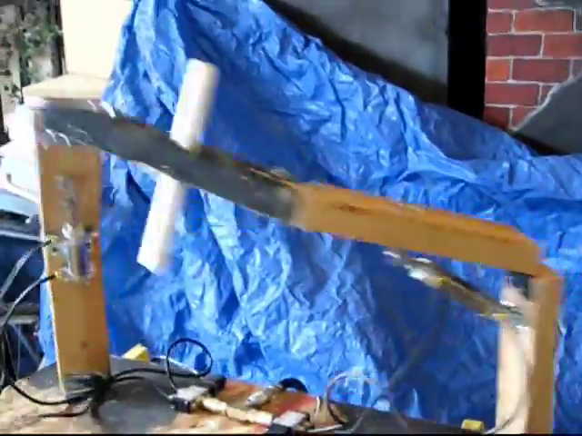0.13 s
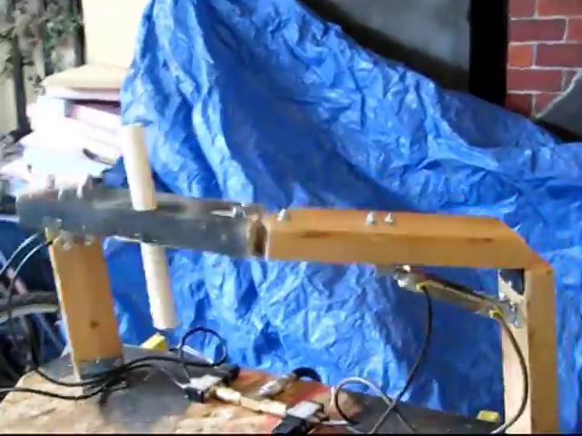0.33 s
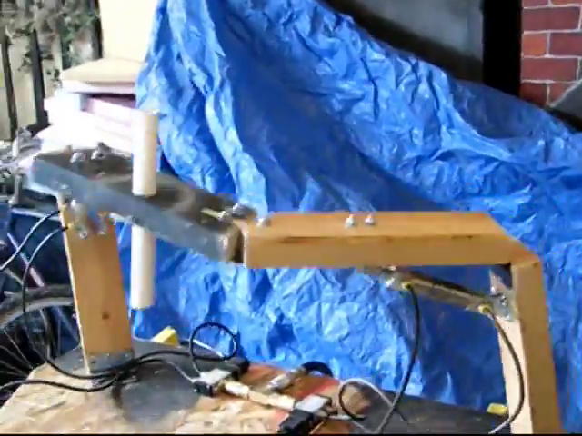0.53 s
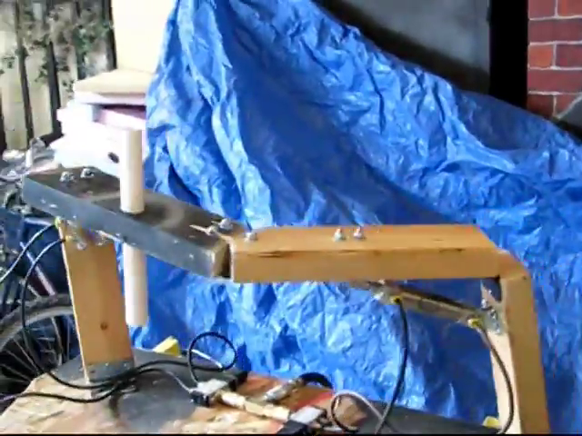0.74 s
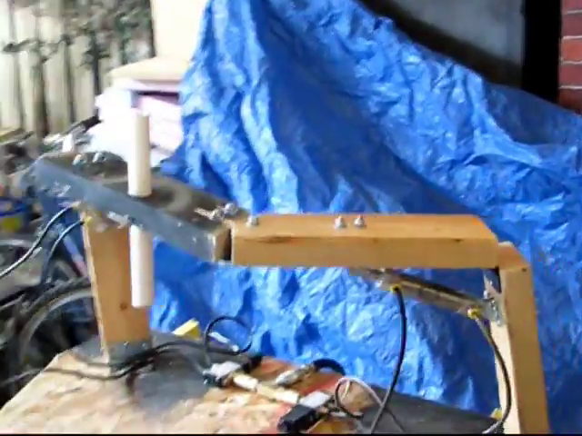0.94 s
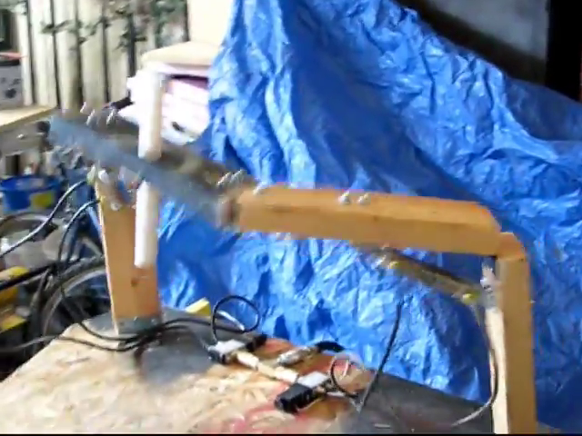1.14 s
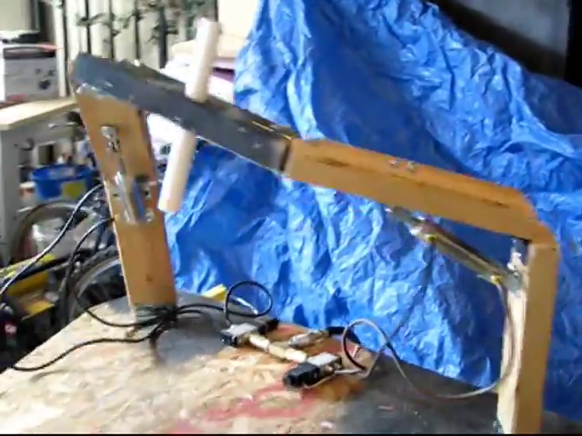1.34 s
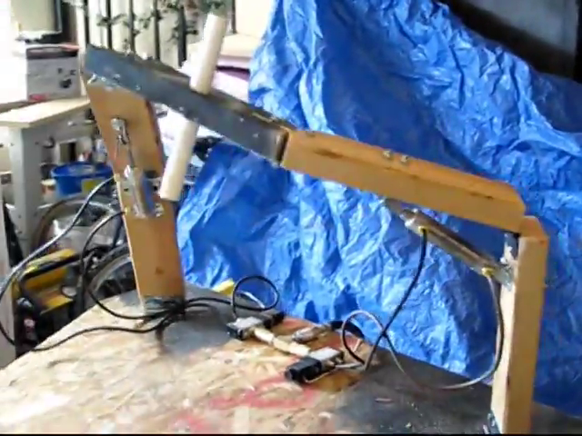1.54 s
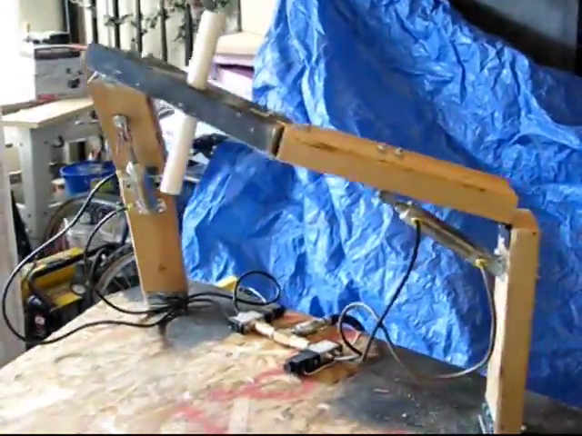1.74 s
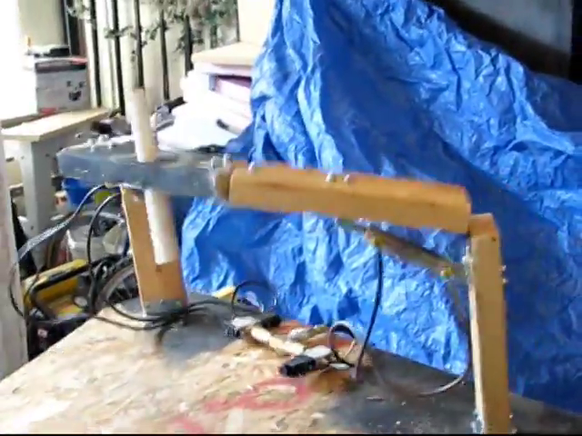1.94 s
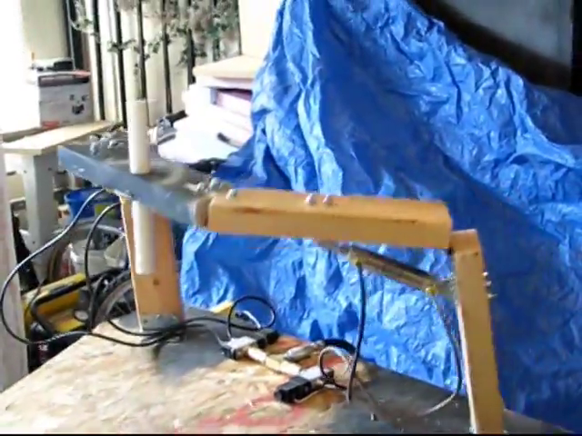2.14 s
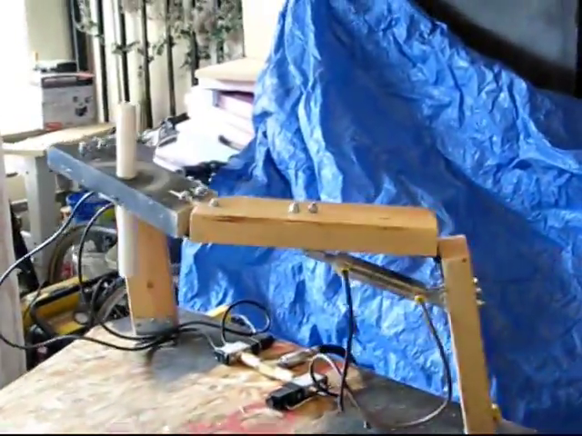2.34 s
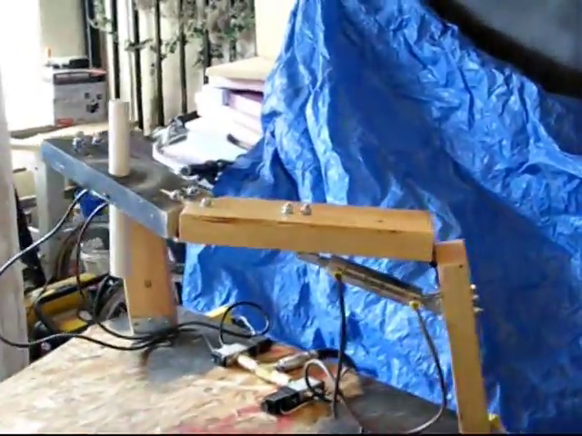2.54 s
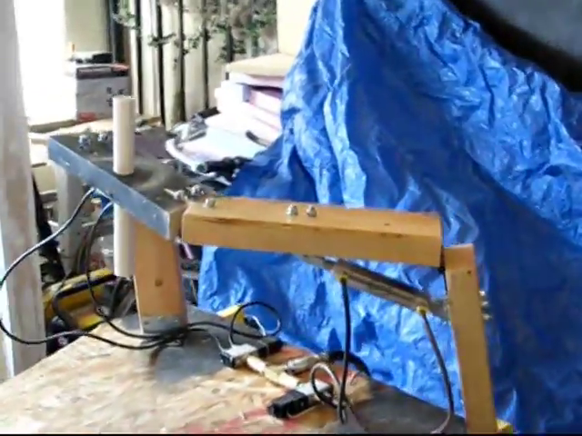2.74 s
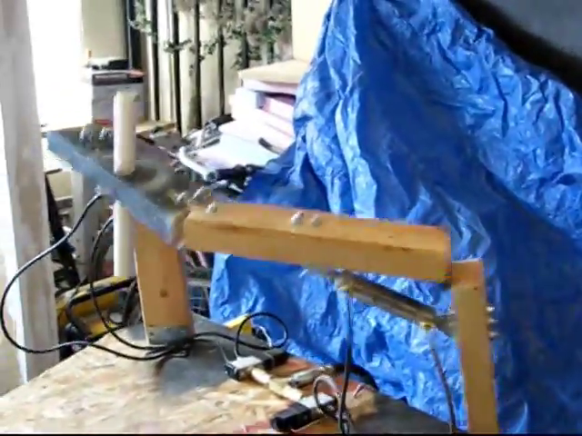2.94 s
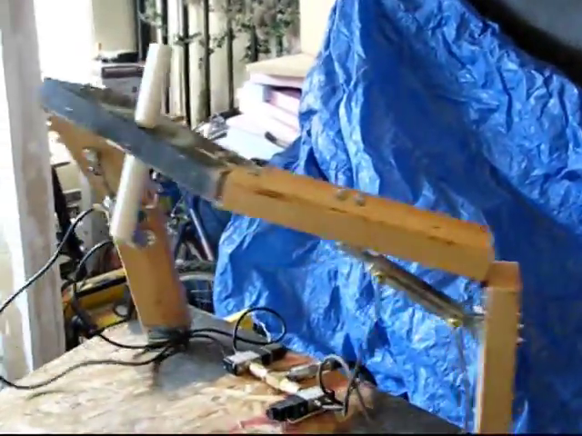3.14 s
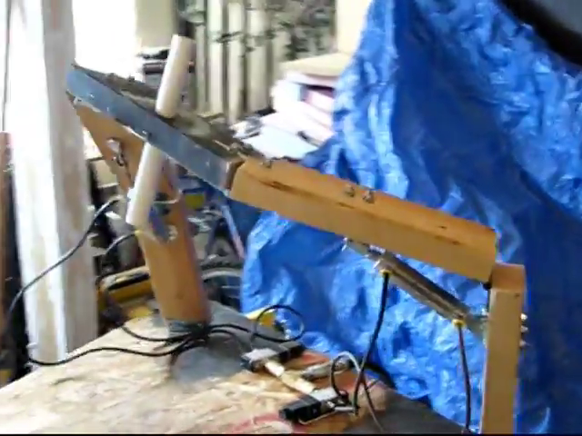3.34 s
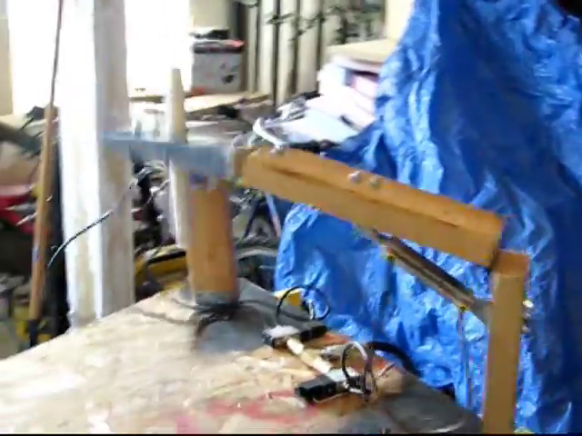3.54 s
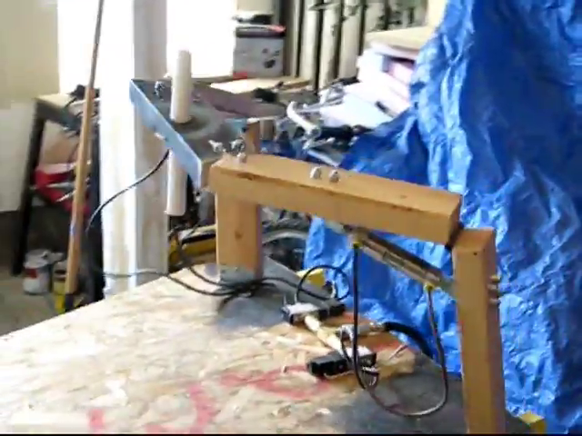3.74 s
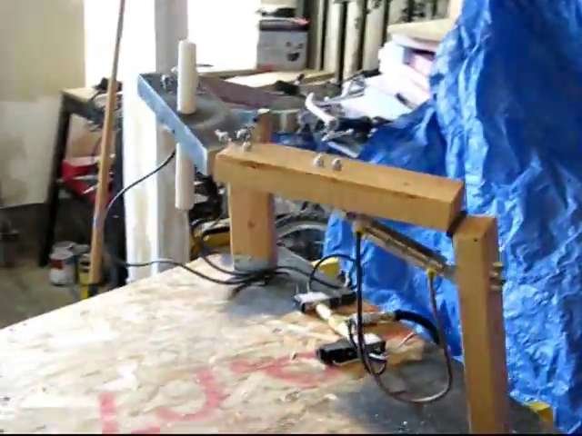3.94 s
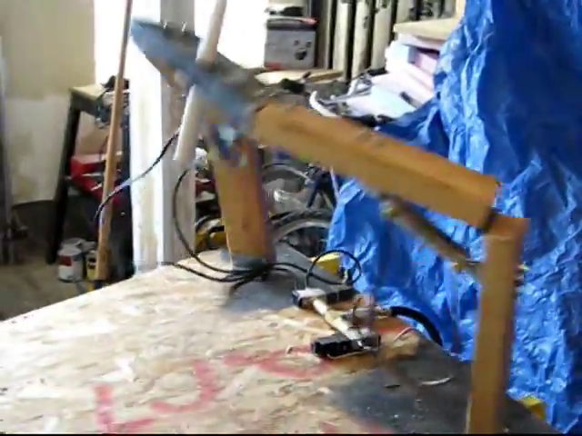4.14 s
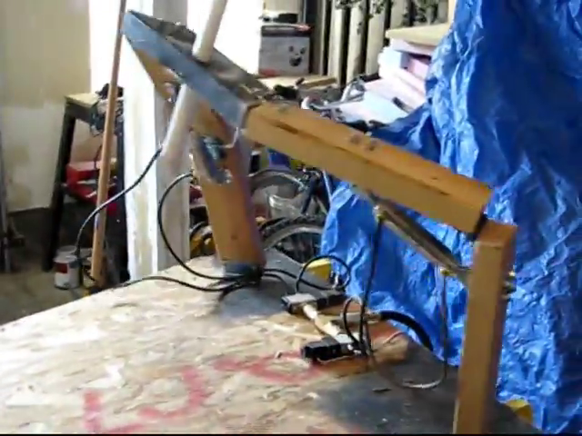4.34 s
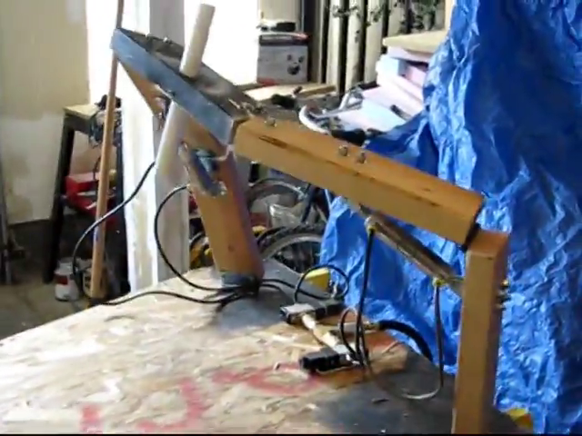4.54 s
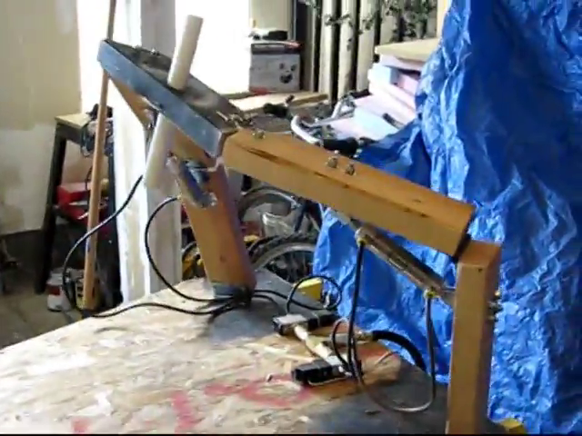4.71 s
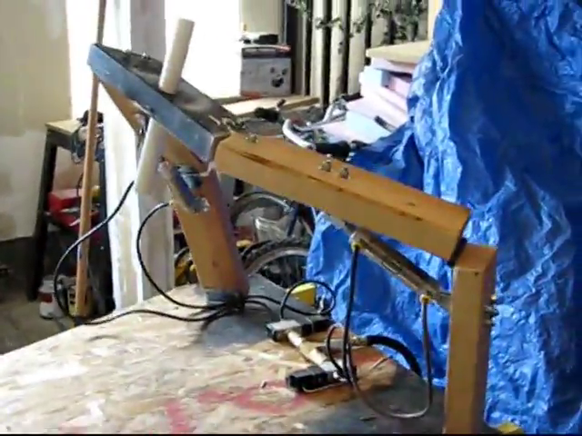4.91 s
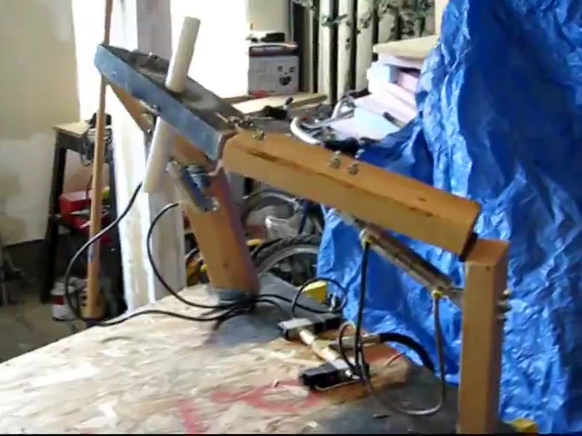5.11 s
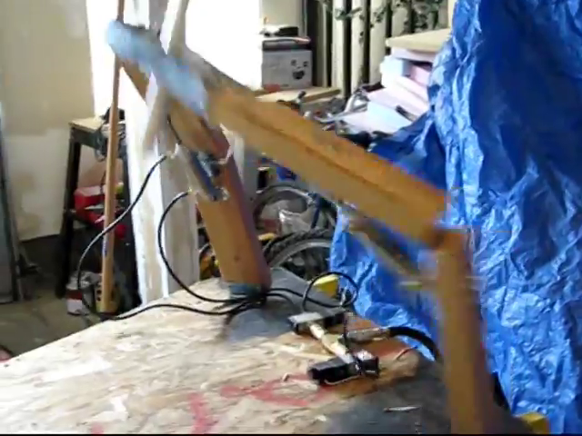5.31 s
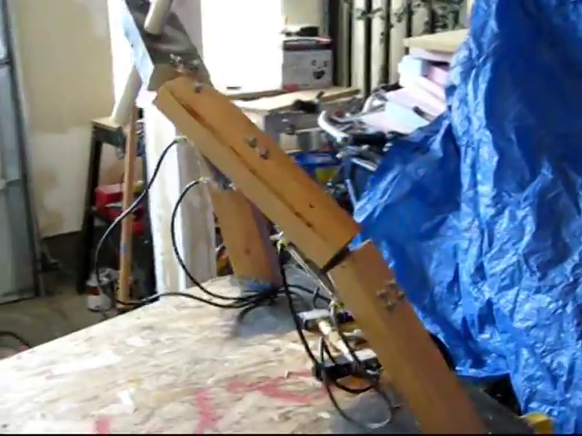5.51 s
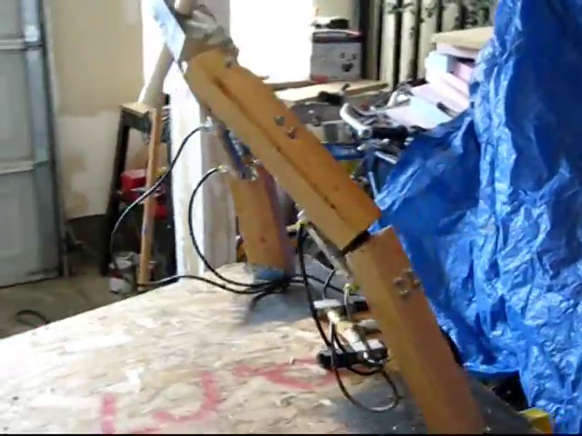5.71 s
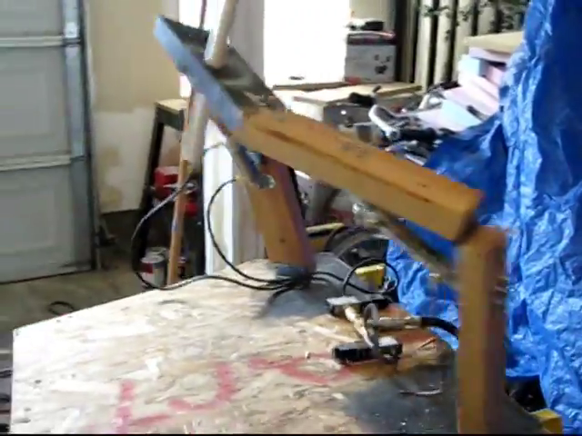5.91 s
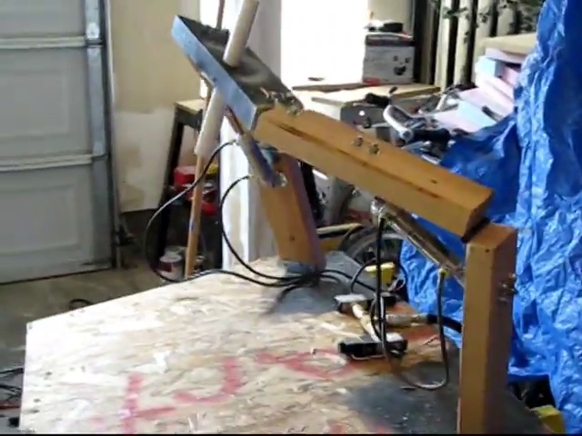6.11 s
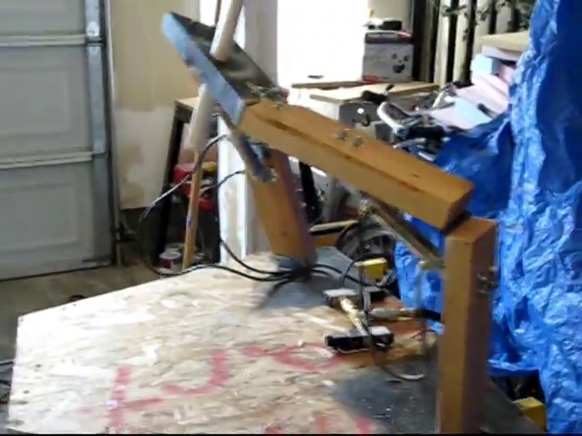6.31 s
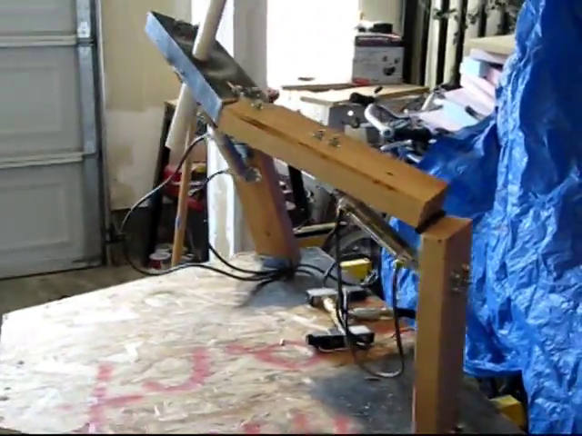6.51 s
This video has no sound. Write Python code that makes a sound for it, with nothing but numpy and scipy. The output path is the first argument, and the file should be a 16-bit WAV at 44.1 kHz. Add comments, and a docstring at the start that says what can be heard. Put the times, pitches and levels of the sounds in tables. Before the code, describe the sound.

Pneumatic cylinders jerk a prop's jointed wooden arms eight times at uneven intervals. Each move starts with a valve click and a short rush of air, scrapes briefly, then ends in a hard knock with a metallic crack and ticking loose joints. A few tiny squeaks slip in, and the last two moves come close together. It is heard nearby in stereo, in a garage with short reverberation and a low rumble.

```python
"""Hard knocks and rattles: pneumatic cylinders jerk a prop's jointed wooden arms up and down.
Each move is a valve click, a rush of air, a scraping stroke and a slam at the end stop, after which
the loose joints tick and the frame rings briefly. Seals squeak and hoses rustle in between.
The place is a garage with a low background rumble, heard from a closely spaced microphone pair,
near enough for sharp cracks and far enough for the room to answer every blow."""
import sys
import numpy as np
from scipy import signal
from scipy.fft import rfft, irfft, next_fast_len
from scipy.io import wavfile
from scipy.ndimage import uniform_filter1d

SR = 44100
rng = np.random.default_rng(int(sys.argv[2]) if len(sys.argv) > 2 else 0)


def materialize(psi):
    """Save the field psi as 16-bit PCM at rate SR to the path in sys.argv[1].

    A 1-D psi becomes a single channel; in a 2-D psi each row is a channel.
    """
    bounded = np.clip(np.atleast_2d(psi).T, -1, 1)
    quanta = np.round(bounded * 32767).astype(np.int16)
    wavfile.write(sys.argv[1], SR, quanta)


N = 289296

# Table levels are relative: filters and each layer's gain act on them. Bass and treble are shelves.
# spectra of the sources: f/Hz, level/dB
LIFT = [(50, -11), (130, 1.5), (240, -3), (350, -5), (490, -5), (620, -0.5), (900, -6), (1750, -5),
        (2200, -11), (3100, -7.5), (5000, -9.5), (8500, -16), (12000, -20.5), (16000, -39)]  # arm thrown up
DROP = [(45, -11.5), (140, -8.5), (280, -5), (400, -1), (700, 0), (1050, -3.5), (1500, -4.5), (2200, -5),
        (2800, -9), (4200, -13.5), (6200, -16.5), (7500, -19), (12000, -24), (16000, -32.5)]  # arm dropped
REACH = [(50, -24.5), (115, -12.5), (200, -8), (400, -8.5), (560, 1.5), (750, -3.5), (1500, -4.5),
         (2500, -9.5), (4500, -15.5), (6800, -23), (9000, -23.5), (13000, -32), (16000, -37)]  # long reach
PULL = [(45, 1), (80, -17.5), (150, -0.5), (320, -2.5), (450, -5.5), (600, -4), (800, -11), (1100, -7),
        (1800, -7), (2600, -11.5), (3500, -10), (6500, -16), (11000, -22), (16000, -36)]  # pull back
KICK = [(60, -24), (130, -9.5), (420, -9.5), (520, -9.5), (680, 1.5), (880, -7), (1100, -11), (1700, -8),
        (2300, -16.5), (6000, -16), (10000, -20), (16000, -33)]  # piston kicking off
HARDWARE = [(80, -10.5), (300, -7), (1000, 0.5), (2300, -3.5), (4000, -4.5), (7000, -8.5), (11000, -10.5),
            (16000, -23.5)]  # loose bolts and hinges
CRACK = [(60, -22), (250, -17), (520, -4.5), (900, -14.5), (1550, 1.5), (2400, -3.5), (3300, 0.5),
         (4300, -6), (5700, -7), (8000, -11.5), (12000, -20.5), (16000, -21.5)]  # metal on metal
VALVE = [(100, -6), (600, -1), (2000, -3), (5000, -1.5), (9000, -2.5), (14000, -4), (16000, -6.5)]  # solenoid click
AIR = [(100, -1.5), (400, 0.5), (1300, -9.5), (2000, -0.5), (3100, -2.5), (4100, -1.5), (5200, -1),
       (8000, -8.5), (11500, -6.5), (14000, -10.5), (16000, -16.5)]  # air jet, also the rustles
SLIDE = [(60, -8), (146, -3), (230, -2.5), (370, 2), (480, -6), (640, -1), (1200, -7), (1750, -3),
         (2300, -9.5), (4400, -9.5), (9000, -18.5), (16000, -33.5)]  # rods and wood rubbing
HUSH = [(20, -2), (45, -1), (80, -8), (125, -9.5), (200, -17), (280, -15), (400, -24), (800, -19),
        (1500, -24.5), (3700, -26), (7300, -29.5), (14000, -36), (16000, -45)]  # room tone
# end-stop spectrum for each kind of move
STOP_SPECTRA = {"lift": LIFT, "drop": DROP, "reach": REACH, "pull": PULL}
# moves: valve t/s, kind, valve/dB, air/dB, air treble/dB, kick-off/dB, slide/dB
MOVES = [ (0.127, "drop", -40, -45, -11, -34, -27.5), (1.0574, "lift", -23.5, -30, 5, -47.5, -42.5),
         (1.752, "drop", -33.5, -26, -9, -30.5, -28), (2.8725, "lift", -17.5, -28, 3.5, -46, -43),
         (3.4503, "drop", -30.5, -23, -6.5, -29.5, -23.5), (3.9984, "lift", -24.5, -35.5, 7.5, -58, -45),
         (5.2672, "reach", -13.5, -32, -4, -21.5, -34.5), (5.7267, "pull", -29.5, -28.5, -23, -34, -22.5)]
# end stop of each move: t/s, body/dB, bass/dB, treble/dB, crack/dB, ring/dB, resonance f/Hz, height/dB
STOPS = [ (0.2683, -17, -3.5, 0.5, -5.5, -24.5, 1500, 6.5), (1.3105, -23, -6, -1.5, -15, -39.5, 370, 5.5),
         (1.8841, -23, 7, 7, -9.5, -37, 1896, 0), (3.1156, -19.5, -3, 3, -19, -35, 370, 11.5),
         (3.5795, -23.5, -2, 4.5, -5.5, -30, 1578, 4), (4.2477, -22.5, -6.5, -4, -20, -32, 1730, -1),
         (5.4284, -22, 2.5, 17.5, -17.5, -24.5, 124.5, 9.5), (5.8372, -16.5, 0.5, -2, -11, -29.5, 805, 13)]
# one rebound after each stop: t/s, kind, body/dB, treble/dB, crack/dB, resonance f/Hz, height/dB
REBOUNDS = [(0.2896, "drop", -20.5, -15, -4.5, 2850, 11.5), (1.334, "lift", -38.5, -8, -18.5, 1440, -2.5),
            (1.902, "drop", -21.5, 0, -10.5, 2844, 6.5), (3.135, "lift", -32, 6.5, -22.5, 4034, 7.5),
            (3.599, "drop", -25.5, 1, -20, 3300, 3.5), (4.2709, "lift", -28, -12.5, -15.5, 7360, 12),
            (5.433, "reach", -39.5, 20, -21.5, 9600, 10), (5.854, "pull", -30.5, -12.5, -10.5, 1220, 16)]
# a heavy arm sags back onto its joints: t/s, kind, body/dB, bass/dB, treble/dB, ring/dB
SETTLES = [(1.983, "drop", -23.5, 2, -8.5, -43), (3.680, "drop", -25, -0.5, -26, -28.5),
           (5.508, "reach", -27, 11.5, 14, -36), (5.910, "pull", -27, 0.5, 4, -36.5)]
# loose hardware knocks: t/s, body/dB, resonance f/Hz, height/dB
KNOCKS = [(.06, -33.5, 740, 9), (.191, -31.5, 4100, -5), (1.241, -39.5, 2300, 12.5),
          (1.261, -45.5, 2410, 12.5), (1.472, -50, 6700, 2), (1.812, -28.5, 4230, -2.5),
          (2.343, -56.5, 3300, 12.5), (3.035, -46.5, 2850, 14), (3.068, -45, 3630, 7),
          (3.287, -43.5, 5360, 3.5), (3.512, -35.5, 4500, 8), (3.814, -43, 4070, 4)]
# piston taking up slack, by kind: bass/dB, treble/dB, crack over body/dB, resonance f/Hz, height/dB
KICK_OFF = {"lift": (5, -6, 15, 399, 4), "drop": (3, 1.9, 7, 1550, 2), "reach": (-1.5, 2, -5.5, 791, 0.5),
            "pull": (1, 12.6, 8.1, 5900, 3.1)}
# wait after the valve click, by kind: t/s
KICK_LAG_S = {"lift": .0104, "drop": .034, "reach": .023, "pull": .0297}  # until the piston moves
AIR_LAG_S = {"lift": .004, "drop": .018, "reach": .012, "pull": .033}  # until the port vents
# modes of the wooden frame and its fittings: f/Hz, level/dB, t60/s
FRAME_MODES = [(125, -7, 0.68), (264, -2, 0.6), (274, -6.5, 0.5), (327.5, -8, 0.6), (381.3, -5, 0.72),
               (496.5, -10.5, 0.44), (581.6, -2.5, 0.32), (725, -12, 0.18), (802, -13, 0.25),
               (917, -12, 0.27), (1113, -9.5, 0.55), (1295, -8.5, 0.15), (1678, -14.5, .42),
               (1773, -14, 0.18), (2110, -17, 0.32), (2707, -16, 0.2), (2790, -17, 0.24), (3040, -19, 0.31),
               (3690, -15, 0.13), (4800, -20, 0.24), (6080, -18, 0.11)]
# sliding, by kind: change over the stroke/dB, bass/dB, treble/dB, resonance f/Hz, height/dB
TRAVEL = {"lift": (1, 8, -8, 800.5, 3.5), "drop": (-5, 7, 0.5, 1743.5, 4),
          "reach": (1.5, 1, -6, 1601.5, 4.5), "pull": (-21, -14, -17.5, 1537, 7)}
# frame shudders: start/s, end/s, first/dB, last/dB, bass/dB, treble/dB, resonance f/Hz, height/dB
SHUDDERS = [(0, 0.058, -23, -36, -4, -0.5, 2960, 10), (0.06, 0.165, -33, -33.5, 6.5, -9, 300, 0),
            (3.601, 3.777, -26, -42, 1.5, -0.5, 1143, -6), (5.552, 5.775, -39.5, -43, -8.5, -17.5, 8800, 5),
            (5.95, 6.143, -62, -39, 3, -2, 122, 33)]
# solenoid, by kind: click swell/ms, room/dB
SOLENOID = {"lift": (1.4, -13.5), "drop": (2.6, -3), "reach": (0.72, -13.5), "pull": (1.9, -8)}
# exhaust port, by kind: rise/s, decay/s, resonance f/Hz, height/dB
PORT = {"lift": (0.004, 0.035, 11000, 2.4), "drop": (0.0092, 0.055, 4400, 4.7),
        "reach": (.006, .22, 8700, 11), "pull": (.006, .11, 10000, 3)}
# dry seals and hinges: start/s, end/s, first f/Hz, last f/Hz, level/dB, roughness (0-1)
SQUEAKS = [(.054, .112, 780.6, 699, -31, .65), (0.194, 0.208, 4080, 3970, -32, 0.42),
           (.207, 0.236, 6600, 6250, -36.5, 0.4), (2.776, 2.814, 1042, 1180, -66, 0.86),
           (3.553, 3.573, 4920, 4710, -26, 0.6), (3.561, 3.59, 6000, 6100, -25.5, .65),
           (5.286, 5.361, 695, 960, -27, .75), (5.403, 5.408, 8800, 8300, -30, .3)]
# hoses and tarpaulin: start/s, end/s, level/dB, treble/dB
RUSTLES = [(0.566, 0.647, -46, -23), (0.784, .841, -48.5, -19), (0.995, 1.055, -63, 0.5),
           (1.499, 1.661, -62, 1), (4.555, 4.696, -68, 15), (5.017, 5.09, -57.5, 4.5)]
# slow drift of the room tone: t/s, level/dB
HUSH_LEVEL = [(0, -69), (1, -60.5), (2.7, -61.5), (4.901, -58.5), (5.2, -58), (6.5, -57)]
# reverberation of the garage: f/Hz, t60/s
GARAGE_T60 = [(60, .59), (130, .95), (350, .74), (700, .67), (1400, .73), (2700, .6), (4000, .55),
              (5500, .48), (8000, .42), (11000, .31), (16000, .25)]
# diffuse sound at the microphone pair: f/Hz, side minus mid/dB
WIDTH = [(40, -24), (125, -30), (250, -24), (500, -16.5), (1000, -11), (2000, -4.5), (4000, 0), (12000, 2)]
# colour difference between the microphones: f/Hz, left minus right/dB
MIC_BALANCE = [(350, 0), (1000, -.3), (2200, -3.8), (4000, .3), (8000, .4), (14000, -.3)]


def blows():
    """The piston kicks off, slams into its stop and rebounds; arms settle and hardware knocks."""
    out = np.zeros((2, N))
    for s, kind, _, _, _, db, _ in MOVES:
        bass_db, treble_db, crack_db, *resonance = KICK_OFF[kind]
        kick = blow(KICK, db, db + crack_db, db - 17.5, bass_db, treble_db, *resonance, crack_ms=5)
        add(out, s + KICK_LAG_S[kind], kick)
    for (_, kind, *_), (s, db, bass_db, treble_db, crack_db, ring_db, *resonance) in zip(MOVES, STOPS):
        slam = blow(STOP_SPECTRA[kind], db, crack_db, ring_db, bass_db, treble_db, *resonance)
        add(out, s, slam)
    for s, kind, db, treble_db, crack_db, *resonance in REBOUNDS:
        bounce = blow(STOP_SPECTRA[kind], db, crack_db, db - 11, 1.5, treble_db, *resonance, crack_ms=2.3)
        add(out, s, bounce)
    for s, kind, db, bass_db, treble_db, ring_db in SETTLES:
        add(out, s, blow(STOP_SPECTRA[kind], db, db + 2, ring_db, bass_db, treble_db, crack_ms=3))
    for s, db, *resonance in KNOCKS:
        add(out, s, blow(HARDWARE, db, db + 9, db - 19, 2.5, -3.5, *resonance, crack_ms=2.6))
    return out


def blow(spectrum, body_db, crack_db, ring_db, bass_db, treble_db, part_hz=1000, part_db=0,
         crack_ms=2.45, wood_decay_s=0.03):
    """One blow: a body of woody clatter and room tail, a metal crack and the ringing frame."""
    t = np.arange(SR) / SR
    clatter = gain_of(-2) * friction(SR, grain_db=9.5, grains_hz=596.3) * np.exp(-t / wood_decay_s)
    body = coloured(clatter + room_tail(), spectrum, bass_db, treble_db, part_hz, part_db, width=0.13)
    crack = coloured(chatter(crack_ms), CRACK, 0, treble_db, part_hz, part_db)
    out = gain_of(body_db) * body
    add(out, 0, gain_of(crack_db) * crack)
    add(out, 0, gain_of(ring_db) * frame_ring())
    return out


def chatter(swell_ms, spread=0.92):
    """Hard parts chatter in contact for a few milliseconds, partly alike at both microphones."""
    u = np.arange(SR // 25) / SR * 1000 / swell_ms
    shape = u ** 2 * np.exp(1 - u ** 2)
    burst = rng.standard_normal(len(u)) * shape
    for _ in range(8):  # a hard contact excites all frequencies evenly, yet stays short
        flat_spectrum = np.exp(1j * np.angle(rfft(burst)))
        burst = irfft(flat_spectrum, len(u)) * shape ** .5
    burst = evened(burst) + spread * evened(diffuse(len(u)) * shape)
    return evened(burst) * np.sqrt(np.mean(shape ** 2))


def frame_ring(build_s=0.0069):
    """The frame's modes ring down, with new phases at every blow."""
    t = np.arange(SR) / SR
    ring = sum(gain_of(db - 60 * t / t60) * np.sin(2 * np.pi * (hz * t + rng.random()))
               for hz, db, t60 in FRAME_MODES)
    return gain_of(-2) * ring * (1 - np.exp(-t / build_s))


def through_frame(x, q=50, fittings_hz=900):
    """Narrow resonances, mostly those of the metal fittings, colour whatever sounds in the arms."""
    peaks = sum(gain_of(db / 4) * hz / (hz + fittings_hz) * resonate(x, hz, q)
                for hz, db, _ in FRAME_MODES)
    return gain_of(-0.99) * (x + 2 * gain_of(-7) * peaks)


def on_bench(x):
    """The bench top hums at one note along with the arms bolted to it."""
    return x + gain_of(-3) * resonate(x, hz=264.7, q=51)


def thumps(hz=137.7, swell_s=0.0085):
    """Each end stop shoves the bench, which answers with a short low thump."""
    out, t = np.zeros(N), np.arange(SR // 4) / SR
    push = np.sin(2 * np.pi * hz * t) * t / swell_s * np.exp(1 - t / swell_s)
    for s, body_db, bass_db, *_ in STOPS:
        add(out, s, gain_of(body_db + bass_db - 8.5) * push)
    return out


def loose_joints(ticks=8, spread_db=3, mean_wait_s=0.033, fade_db_per_s=85):
    """Bolts and hinges go on ticking after each end stop, weaker as the shaking dies."""
    out = np.zeros((2, N))
    for s, body_db, *_ in STOPS:
        for wait, size in zip(rng.exponential(mean_wait_s, ticks), rng.uniform(-1, 1, ticks)):
            tick_db = body_db - 15 + spread_db * size - fade_db_per_s * wait
            tick = coloured(chatter(swell_ms=1), HARDWARE, treble_db=0.5)
            add(out, s + .02 + wait, gain_of(tick_db) * tick)
    return out


def strokes():
    """Rods slide and wooden joints scrape from kick-off to end stop, and while the frame shudders."""
    out = np.zeros(N)
    for (s, kind, *_, db), (stop_s, *_) in zip(MOVES, STOPS):
        start = s + KICK_LAG_S[kind]
        change_db, *colour = TRAVEL[kind]
        add(out, start, scrape(stop_s - start, db, db + change_db, *colour))
    for start, end, *levels_and_colour in SHUDDERS:
        add(out, start, scrape(end - start, *levels_and_colour))
    return gain_of(-6) * in_garage(out, direct_db=1.5)


def scrape(length_s, first_db, last_db, *colour):
    """Friction that swells or fades evenly while wood and rod move."""
    count = int(length_s * SR)
    speed = gain_of(np.linspace(first_db, last_db, count)) * signal.windows.tukey(count, .05)
    rubbing = friction(SR, grain_db=2, grains_hz=303)[:count]
    return coloured(speed * rubbing, SLIDE, *colour)[0]


def friction(count, grain_db, grains_hz):
    """Rubbing noise whose strength varies from grain to grain."""
    grain = np.arange(count) * grains_hz / SR
    sizes_db = grain_db * rng.standard_normal(SR // 10)
    strength = gain_of(np.interp(grain, np.arange(len(sizes_db)), sizes_db))
    return evened(rng.standard_normal(count) * strength)


def valves():
    """A solenoid snaps over before each move and the room answers."""
    out = np.zeros((2, N))
    for s, kind, db, *_ in MOVES:
        swell_ms, room_db = SOLENOID[kind]
        click = gain_of(room_db) * room_tail()
        add(click, 0, chatter(swell_ms))
        add(out, s, gain_of(db) * coloured(click, VALVE))
    return out


def exhaust():
    """Just after the valve opens, air jets from the port and fades as the cylinder empties."""
    out, t = np.zeros(N), np.arange(SR // 2) / SR
    for s, kind, _, db, treble_db, *_ in MOVES:
        rise_s, decay_s, port_hz, port_db = PORT[kind]
        pressure = (1 - np.exp(-t / rise_s)) * np.exp(-t / decay_s)
        turbulence = pressure * rng.standard_normal(len(t))
        jet = coloured(turbulence, AIR, 0, treble_db, port_hz, port_db, width=0.078)[0]
        add(out, s + AIR_LAG_S[kind], gain_of(db) * jet)
    return gain_of(-3) * in_garage(out, direct_db=3.5)


def squeaks(waver_hz=120, fade_db=-5.5):
    """Seals and hinges stick and slip at an unsteady pitch; rough ones catch and let go at random."""
    out = np.zeros(N)
    for start, end, first_hz, last_hz, db, rough in SQUEAKS:
        count = int((end - start) * SR)
        drift = evened(uniform_filter1d(rng.standard_normal(SR // 4), size=40))[:count]
        catches = evened(uniform_filter1d(rng.standard_normal(SR // 4), size=140))
        grip = evened(1 - rough + rough * catches)[:count]
        turns = np.cumsum(np.linspace(first_hz, last_hz, count) + waver_hz * drift) / SR
        fade = gain_of(db + np.linspace(0, fade_db, count)) * signal.windows.tukey(count, .3)
        add(out, start, fade * grip * np.sin(2 * np.pi * turns))
    return gain_of(-3) * in_garage(out, direct_db=9.5)


def rustles(bass_db=6):
    """Hoses and tarpaulin settle faintly between moves."""
    out = np.zeros(N)
    for start, end, db, treble_db in RUSTLES:
        count = int((end - start) * SR)
        crinkle = friction(SR, grain_db=4, grains_hz=400)[:count] * signal.windows.tukey(count, .4)
        add(out, start, gain_of(db) * coloured(crinkle, AIR, bass_db, treble_db)[0])
    return gain_of(-7.5) * in_garage(out, direct_db=0)


def room_tail(build_s=0.00045):
    """The garage's answer to one impulse: diffuse sound builds up and each band dies at its own speed."""
    hz, t, bands = signal.stft(diffuse(SR), SR, nperseg=256)
    decay = gain_of(-60 * t / value_at(GARAGE_T60, hz)[:, None])
    dying = signal.istft(bands * decay, SR, nperseg=256)[1][:, :SR]
    return dying * (1 - np.exp(-np.arange(SR) / SR / build_s))


def in_garage(x, direct_db):
    """A source reaches the microphones directly and off the walls; more direct sound seems closer."""
    room = room_tail()
    reverb = signal.fftconvolve(x[None], room / np.linalg.norm(room[0]), axes=1)[:, :N]
    return gain_of(direct_db) * x + reverb


def room_tone():
    """The low rumble and faint hiss of the garage, all around the microphones."""
    level_db = np.interp(np.arange(N) / SR, *np.transpose(HUSH_LEVEL))
    rumble = coloured(diffuse(next_fast_len(N + SR)), HUSH, size=16384)
    return gain_of(level_db) * rumble[:, SR // 2:][:, :N]


def diffuse(count):
    """White noise from all sides at the microphone pair: alike in the bass, unrelated in the treble."""
    mid, side = rfft(rng.standard_normal((2, count)))
    width = gain_of(value_at(WIDTH, np.fft.rfftfreq(count, 1 / SR)))
    return irfft(np.array([mid + width * side, mid - width * side]) / np.sqrt(1 + width ** 2), count)


def coloured(x, spectrum, bass_db=0, treble_db=0, peak_hz=1000, peak_db=0, width=0.28, size=4096):
    """Causal filter: a spectrum and one resonance at unit energy, then bass and treble shelves."""
    hz = abs(np.fft.fftfreq(size, 1 / SR))
    resonance_db = peak_db / (1 + ((hz / peak_hz - 1) / width) ** 2)
    shelves_db = bass_db / (1 + (hz / 300) ** 2) + treble_db * hz ** 2 / (hz ** 2 + 4000 ** 2)
    gain = evened(gain_of(value_at(spectrum, hz) + resonance_db)) * gain_of(shelves_db)
    minimum_phase = np.exp(np.conj(signal.hilbert(np.log(gain))))
    taps = np.fft.ifft(minimum_phase).real
    return signal.fftconvolve(np.atleast_2d(x), taps[None, :size // 2], axes=1)


def resonate(x, hz, q):
    """The response of one narrow resonance."""
    return signal.lfilter(*signal.iirpeak(hz, q, fs=SR), x)


def gain_of(db):
    """Decibels to gain."""
    return 10 ** (np.asarray(db) / 20)


def evened(x):
    """Scales to rms 1."""
    return x / np.sqrt(np.mean(x ** 2) + 1e-20)


def value_at(points, hz):
    """Reads a table on a log-frequency axis."""
    f, value = np.transpose(points)
    return np.interp(np.log(hz + 1), np.log(f + 1), value)


def add(mix, s, sound):
    """Mixes a sound in at time s."""
    part = mix[..., max(round(s * SR), 0):][..., :sound.shape[-1]]
    part += sound[..., :part.shape[-1]]


def scene():
    """The moving prop and its garage, as they arrive at the microphones."""
    arms = on_bench(through_frame(blows() + strokes())) + thumps() + loose_joints()
    return arms + valves() + exhaust() + squeaks() + rustles() + room_tone()


def record(dry, low_cut_hz=43, high_cut_hz=16000):
    """Two microphones of slightly unlike colour, then a low cut, clipping at full scale and a high cut."""
    size = next_fast_len(N + SR)
    lean_db = value_at(MIC_BALANCE, np.fft.rfftfreq(size, 1 / SR))
    heard = irfft(rfft(dry, size) * gain_of([lean_db / 2, -lean_db / 2]), size)[:, :N]
    low_cut = signal.butter(4, low_cut_hz, "high", fs=SR, output="sos")
    clipped = np.clip(signal.sosfilt(low_cut, heard), -1, 1)
    high_cut = signal.firwin(255, high_cut_hz, window=("kaiser", 9), fs=SR)
    return signal.oaconvolve(clipped, high_cut[None], "same")


dry = scene()
out = record(dry)
materialize(out)
```